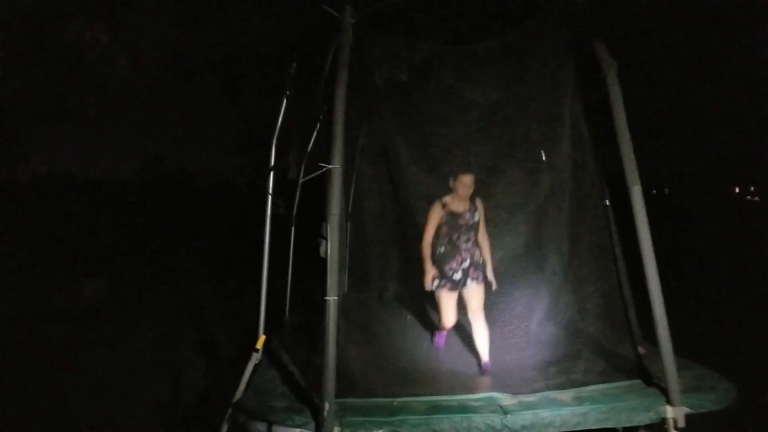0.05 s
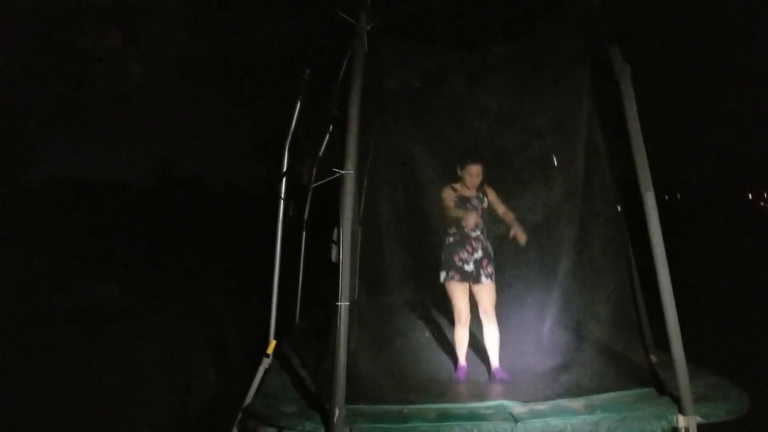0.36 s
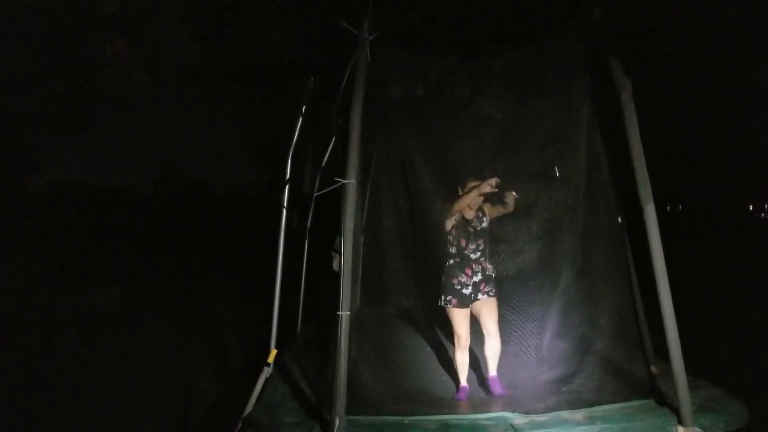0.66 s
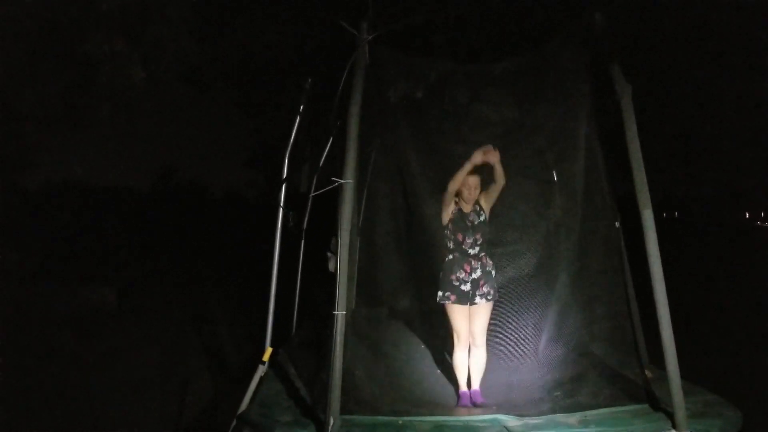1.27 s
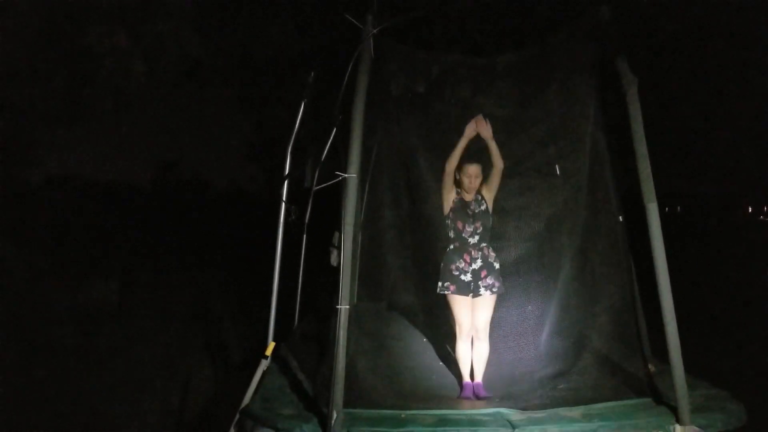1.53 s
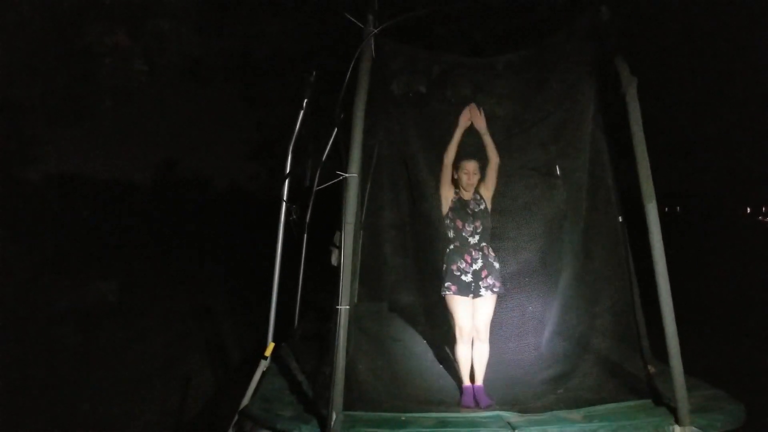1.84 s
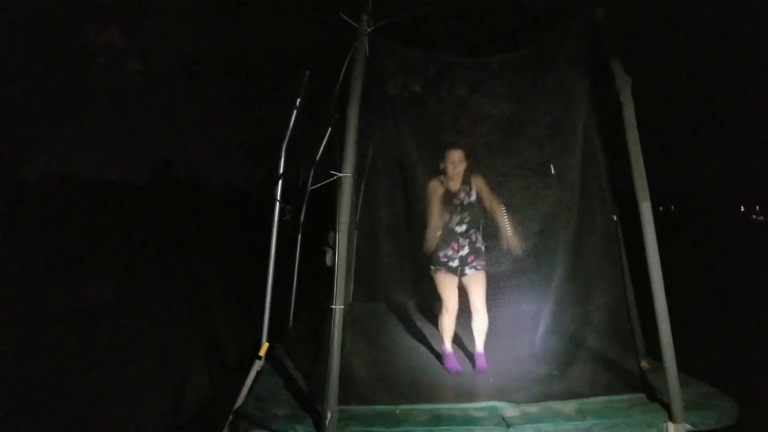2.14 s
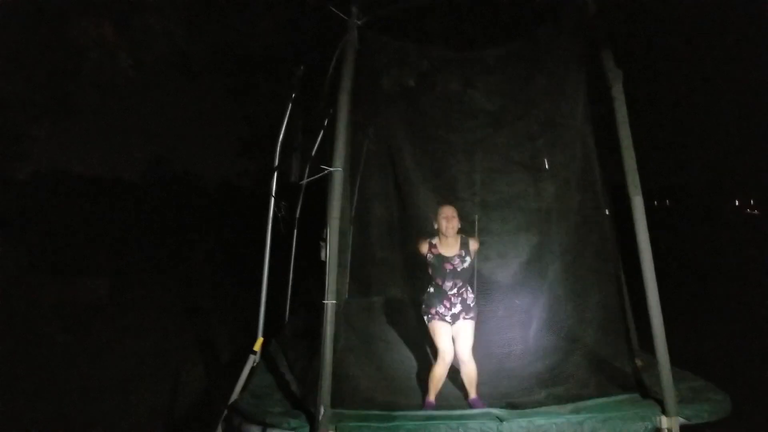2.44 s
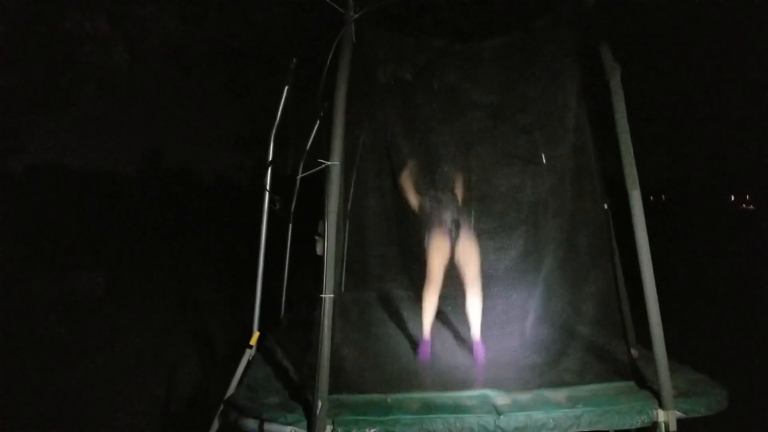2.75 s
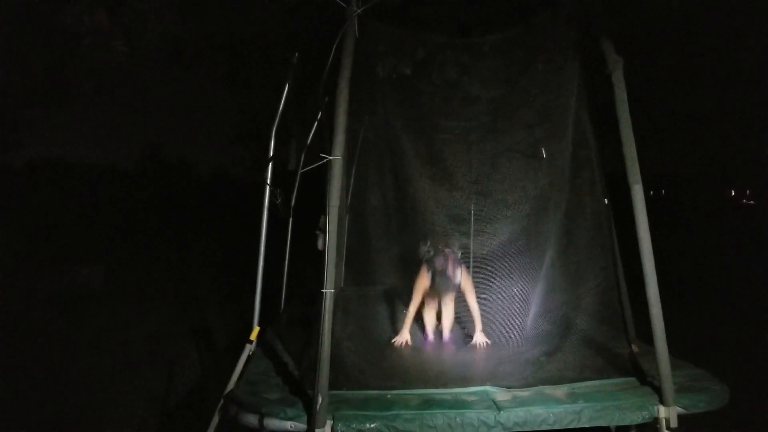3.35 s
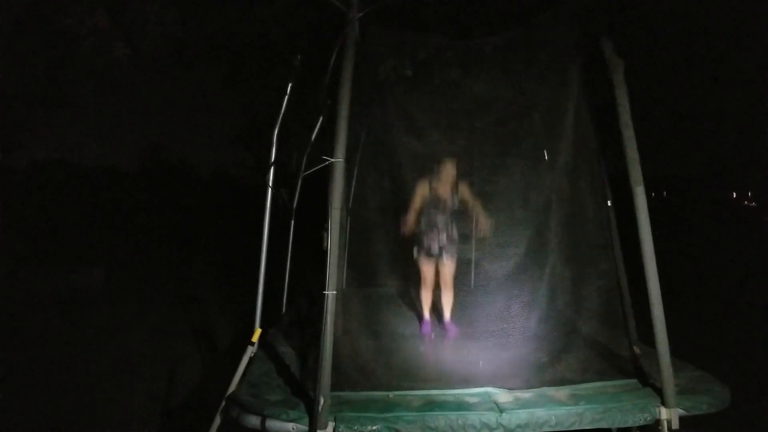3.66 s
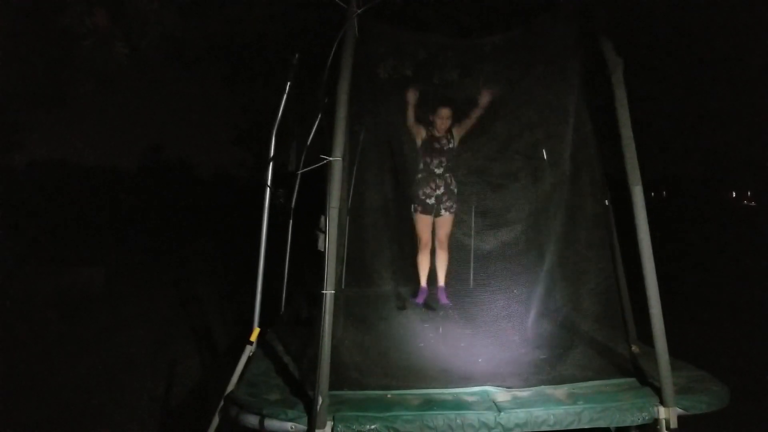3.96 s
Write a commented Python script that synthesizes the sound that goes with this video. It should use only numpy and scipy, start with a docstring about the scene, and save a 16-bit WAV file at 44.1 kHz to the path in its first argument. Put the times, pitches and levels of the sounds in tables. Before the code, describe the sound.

A trampoline creaks and thumps under someone bouncing, with crickets trilling behind.

```python
"""A garden trampoline creaks at night as someone shifts about, bounces and flips on it.
Its steel springs stick and slip in their hooks and ring on. Now and then a hook rubs the frame
tube and makes it sing, and the mat thumps and rustles under hands and feet.
Crickets trill all round with their wings, over a low distant rumble."""
import sys
import numpy as np
from scipy import signal
from scipy.fft import rfft, irfft
from scipy.io import wavfile
from scipy.ndimage import uniform_filter1d

SR = 44100
rng = np.random.default_rng(int(sys.argv[2]) if len(sys.argv) > 2 else 0)


def int16_out(signal):
    """Quantize to a 16-bit WAV file."""
    q = np.round(np.clip(np.atleast_2d(signal).T, -1, 1) * 32767)
    wavfile.write(sys.argv[1], SR, q.astype(np.int16))


N = 176400
TIME = np.arange(N) / SR
TAIL = 24000  # samples allowed for one sound to die away
LOW_PAN_DB = 5  # rumble and mat are louder on the left


def from_db(db):
    """Turns decibels into a gain."""
    return 10 ** (np.asarray(db) / 20)


def rms_one(x):
    """Scales a signal to an average (rms) level of 1."""
    return x / np.sqrt(np.mean(x ** 2) + 1e-20)


def at_hz(points, hz):
    """Reads between a table's rows along a log-frequency axis."""
    point_hz, values = np.transpose(points)
    return np.interp(np.log(hz + 1), np.log(point_hz), values)


def pan(db):
    """Left and right gains; positive db leans left."""
    return from_db(np.array([[.5], [-.5]]) * db)


def add(out, start_s, sound):
    """Mixes a sound in at a given time."""
    i = max(int(start_s * SR), 0)
    out[..., i:i + sound.shape[-1]] += sound[..., :N - i]


def noise_pair(likeness, size):
    """Left and right white noise: likeness 0 is unrelated, 1 is the same."""
    mid, side = rng.standard_normal((2, size))
    return np.sqrt(1 + likeness) * mid + np.sqrt(1 - likeness) * side * [[1], [-1]]


def noise(colour, likeness):
    """Stereo noise shaped by a table of levels from low to high."""
    gains = from_db(at_hz(colour, np.fft.rfftfreq(N, 1 / SR)))
    return rms_one(irfft(rfft(noise_pair(likeness, N)) * gains, N))


def ringing(modes):
    """Stereo tones that each die away by 60 dB in their fade_s."""
    t = TIME[:TAIL]
    return sum(from_db(db - 60 * t / fade_s) * np.sin(2 * np.pi * (hz * t + rng.random((2, 1))))
               for hz, db, fade_s in modes)


def slips(length_s, swell_db, slips_per_s=1200, spread_db=4.5, breakaway_db=6.5):
    """Steel sticks and slips: one hard click as it breaks free, then an uneven run of clicks."""
    t = TIME[:TAIL]
    slipping = (rng.random(TAIL) < slips_per_s / SR) & (t < length_s)
    size_db = spread_db * np.clip(rng.standard_normal(TAIL), -2, 2)
    size_db += swell_db * np.minimum(t / length_s, 1)
    return slipping * from_db(size_db) + (t == 0) * from_db(breakaway_db)


def at_level(sound, length_s, db):
    """Sets how loud a sound is while the rubbing lasts."""
    rubbed = sound[:, :int((length_s + .004) * SR)]
    return sound * from_db(db) / np.sqrt(np.mean(rubbed ** 2) + 1e-20)


# The tone of the far crickets: pitch_hz, relative_db
CHORUS_COLOUR = [(1500, -19), (2000, -12), (2300, 1.5), (2700, -11.5), (3100, -6), (4000, -25.5),
                 (4700, -3.5), (5050, 0.5), (5350, 3.5), (5700, -3), (6200, -8), (7300, -14.5),
                 (8700, -32.5), (16000, -32.5)]
# How one near cricket's trill changes: time_s, level_db, pitch_hz, strokes_per_s
NEAR_TRILL = [(0, -63, 5250, 60), (1.9, -61, 5300, 57), (2.35, -59, 5380, 57), (2.85, -55, 5520, 70),
              (3.02, -56, 5480, 68), (3.2, -57.5, 5400, 56), (3.35, -57, 5400, 56), (4, -62, 5300, 58)]


def crickets(chorus_db=-56.5, flutter_db=0.5, wander_hz=69.8, fall_hz=804, jitter=.07):
    """A far chorus flutters, and a near cricket's every wing stroke falls in pitch."""
    drifts = uniform_filter1d(uniform_filter1d(rng.standard_normal((3, N)), size=400), size=400)
    flutter, wander, hurry = map(rms_one, drifts)
    chorus = from_db(chorus_db + flutter_db * flutter) * noise(CHORUS_COLOUR, likeness=0.12)
    time_s, *columns = np.transpose(NEAR_TRILL)
    db, hz, strokes_per_s = (np.interp(TIME, time_s, column) for column in columns)
    stroke = np.cumsum(strokes_per_s * (1 + jitter * hurry)) / SR % 1  # 0 to 1 in each stroke
    pitch_hz = hz + wander_hz * wander + fall_hz * (.5 - stroke)
    tone = np.sin(2 * np.pi * np.cumsum(pitch_hz) / SR)
    pulses = np.sin(np.pi * stroke) ** 4
    near = from_db(db + 2 * wander) * rms_one(tone * pulses)
    return (chorus + near) * pan(db=8.5)


# The tone of the rumble: pitch_hz, relative_db
RUMBLE_COLOUR = [(20, -16), (40, -4), (62, 4), (110, 2.5), (170, -4.5), (260, -12.5), (420, -26.5),
                 (700, -20.5), (1200, -28.5), (3000, -40)]


def rumble(level_db=-62):
    """A low, steady noise from far away."""
    return from_db(level_db) * noise(RUMBLE_COLOUR, likeness=0.99) * pan(LOW_PAN_DB)


# Each creak of a spring in its hook: start_s, length_s, relative_db, swell_db, body_db, treble_db
# (swell is how much the clicks grow; body and treble turn the lows and highs up or down)
SPRING_CREAKS = [(.037, 0.027, -32.5, -6, -1.5, -5.5), (.064, 0.019, -37.5, -7, 1.5, -2.5),
                 (.134, 0.0087, -27.5, -1, -4, -1), (.15, 0.071, -41.5, -4, 0.5, -2.5),
                 (.357, 0.052, -35.5, 7.5, -4.5, 0), (.413, 0.017, -35.5, 6, -2.5, 0.5),
                 (.477, 0.075, -40.5, -8.5, 6.5, -15), (.655, 0.012, -41, -1, 1.5, -16),
                 (.705, 0.004, -37, 8, -4, -6), (.727, 0.042, -32, -1, -2, -8),
                 (.775, 0.034, -38.5, 7, -3.5, -0.5), (.91, 0.058, -46.5, 0.5, 1.5, -2.5),
                 (1.01, 0.046, -52, 1, 8, -8), (1.113, 0.043, -38, 5, -2.5, 2.5),
                 (1.168, 0.011, -36.5, 3, -0.5, 4.5), (1.385, .08, -53, 3, -4, -2),
                 (1.426, 0.0044, -40.5, -2, -2.5, -16), (1.463, 0.0052, -37.5, -11, -3, -17),
                 (1.576, 0.043, -42, -2.5, -11, 3), (1.635, 0.021, -47.5, 0, -6, 1),
                 (1.978, 0.027, -38.5, 1, -5, -1), (2.03, 0.019, -38.5, 6, -7, 1.5),
                 (2.118, .005, -35, 16, 4, 5.5), (2.148, 0.0074, -38.5, -16, 4, 4),
                 (2.368, 0.0095, -36.5, 4, 3.5, -5), (2.415, 0.061, -38, 0.5, 5, -4),
                 (2.503, 0.037, -32, 5, 2.5, 3.5), (2.56, 0.046, -42.5, -5, 3, 10.5),
                 (2.628, 0.044, -36.5, -8, -1.5, -3.5), (2.677, .004, -42.5, 2, 3, 12),
                 (2.703, 0.015, -37.5, 1, 8, 5), (2.728, 0.028, -34.5, 1.5, 2, -4),
                 (2.772, 0.059, -34, -2.5, -4, 1.5), (2.86, 0.055, -47.5, 5, 2, 5),
                 (3.044, 0.058, -40, 3, -2, 3), (3.105, .016, -38, -4, 5, -0.5),
                 (3.21, 0.05, -48, -16, 9, -5), (3.312, 0.04, -35.5, 0, 0, 0),
                 (3.36, 0.057, -43.5, -1, -2, -3), (3.423, 0.049, -32, 5.5, -5, 0),
                 (3.472, 0.052, -35, -7, -9, 3.5), (3.535, 0.021, -31.5, 7, 0, -3),
                 (3.565, 0.049, -29, -1, 0, 1.5), (3.645, 0.098, -35.5, 0.5, 3.5, 2.5),
                 (3.767, 0.0076, -29.5, -12, 1.5, -6.5), (3.812, 0.052, -36.5, -3.5, -1.5, 6)]
# The tone all creaks share: pitch_hz, relative_db
SPRING_COLOUR = [(150, -17), (400, -18.5), (650, -4.5), (900, -5.5), (1200, 0), (1700, 1.5), (2600, 1),
                 (3100, -1), (3700, 0.5), (4300, -4.5), (5500, -3.5), (6400, -9), (7500, -1), (8800, -13.5),
                 (12000, -13.5), (16000, -15.5)]
# The clear notes of a coil: pitch_hz, relative_db
SPRING_NOTES = [(670, -11.5), (1140, -12), (1675, -1), (1845, 9), (2110, 7), (2290, 11), (2790, -10),
                (3775, -12), (4830, -23), (7165, -6), (7510, 5)]
# How far left each pitch is heard: pitch_hz, left_minus_right_db
SPRING_BALANCE = [(400, 4.5), (1200, 3), (2400, 6.5), (4400, 9.5), (8000, 11), (15000, 5)]


def springs(snap_fade_s=0.042, ring_fade_s=0.34, note_fade_s=0.18, ring_db=-4.5, notes_db=-24.5):
    """Each slip strikes a coil, giving a dry snap, a dense metal ring and a few clear notes."""
    t, out = TIME[:TAIL], np.zeros((2, N))
    hz = np.fft.rfftfreq(2 * TAIL, 1 / SR)
    colour = from_db(at_hz(SPRING_COLOUR, hz))
    body = at_hz([(705, 1), (1870, 0)], hz)
    treble = at_hz([(1750, 0), (8600, 1)], hz)
    place = pan(at_hz(SPRING_BALANCE, hz))
    decay = from_db(-60 * t / snap_fade_s) + from_db(ring_db - 60 * t / ring_fade_s)
    tunings = rng.normal(1, 0.0123, size=7)  # springs differ slightly in pitch
    coil_notes = [ringing([(pitch_hz * tuning, db, note_fade_s) for pitch_hz, db in SPRING_NOTES])
                  for tuning in tunings]
    coils = [rfft(noise_pair(likeness=0.089, size=TAIL) * decay + from_db(notes_db) * notes, 2 * TAIL)
             for notes in coil_notes]
    for k, (start_s, length_s, db, swell_db, body_db, treble_db) in enumerate(SPRING_CREAKS):
        clicks = rfft(slips(length_s, swell_db), 2 * TAIL)
        creak = irfft(clicks * coils[k % len(coils)] * colour)  # every click rings the coil
        creak = at_level(creak, length_s, db - 4)
        tone = from_db(body_db * body + treble_db * treble)
        add(out, start_s, irfft(rfft(creak) * tone * place)[:, :TAIL])
    return out


# Each rub of a hook on the frame: start_s, length_s, level_db
TUBE_RUBS = [(1.982, .02, -44), (2.032, .022, -43), (2.119, .004, -41), (3.417, .025, -40.5)]
# The notes of the frame tube: pitch_hz, relative_db, fade_s
TUBE_NOTES = [(1026, -5.5, 0.2), (1120, -8, 0.17), (1404, 2, 0.13), (1507, -3, 0.31), (1760, -11.5, 0.11),
              (3760, -9, 0.34), (3850, -10, 0.29), (8100, -8, .06)]


def frame():
    """A hook rubs on the steel tube and sets it ringing."""
    out, tube = np.zeros((2, N)), ringing(TUBE_NOTES)
    for start_s, length_s, db in TUBE_RUBS:
        rub = signal.fftconvolve(slips(length_s, swell_db=0)[None], tube)
        add(out, start_s, at_level(rub, length_s, db))
    return out * pan(db=4)


# Hands and feet land on the mat: start_s, relative_db
MAT_LANDINGS = [(2.459, -48), (2.906, -44), (3.019, -52.5), (3.348, -34), (3.362, -40), (3.536, -41),
                (3.551, -28)]
# The low notes in a thump: pitch_hz, relative_db, fade_s
THUMP_NOTES = [(71.6, -8, .14), (133, -5, 0.097), (165, -4.5, .06), (238, -3, 0.055), (316, -6, 0.054),
               (470, -12, 0.055)]
# How loudly the stretching mat rustles: time_s, relative_db
RUSTLE_LEVELS = [(2.3, -71.5), (2.532, -46.5), (2.612, -84), (2.786, -50.5), (2.872, -63), (2.91, -51.5),
                 (2.952, -59), (3.318, -65), (3.354, -51), (3.392, -50.5), (3.564, -34.5), (3.582, -44),
                 (3.928, -60.5), (4.0, -68)]
# The tone of the rustle: pitch_hz, relative_db
RUSTLE_COLOUR = [(50, -13), (130, 3), (230, -3.5), (400, -5.5), (700, -4), (1200, -8), (3000, -20)]


def mat(spread_db=1.7, rustle_gain_db=-2.5):
    """Landings thump the tight cloth like a drum, and it rustles as it stretches."""
    t, thumps = TIME[:TAIL], np.zeros(N)
    for start_s, db in MAT_LANDINGS:
        for k, (hz, note_db, fade_s) in enumerate(THUMP_NOTES):
            fade = from_db(db + note_db + rng.normal(0, spread_db) - 60 * t / fade_s)
            add(thumps, start_s, fade * (-1) ** k * np.sin(2 * np.pi * hz * t))
    stretch_db = np.interp(TIME, *np.transpose(RUSTLE_LEVELS), left=-100)
    rustle = from_db(stretch_db + rustle_gain_db) * noise(RUSTLE_COLOUR, likeness=0.97)
    return (thumps + rustle) * pan(LOW_PAN_DB)


def scene():
    """The trampoline and the night around it."""
    return rumble() + springs() + frame() + mat() + crickets()


def record(dry, cutoff_hz=16000):
    """Cuts off the very highest treble steeply."""
    return signal.sosfilt(signal.ellip(12, .2, 80, cutoff_hz, fs=SR, output="sos"), dry)


dry = scene()
out = record(dry)
int16_out(out)
```